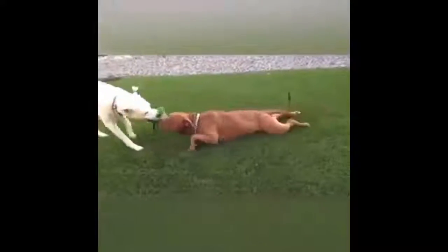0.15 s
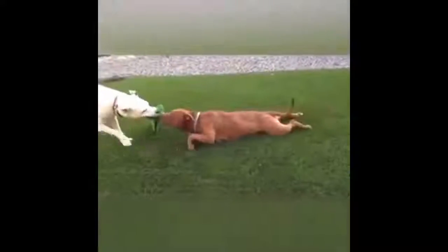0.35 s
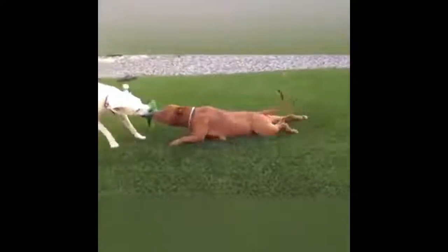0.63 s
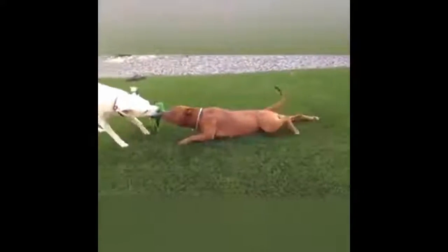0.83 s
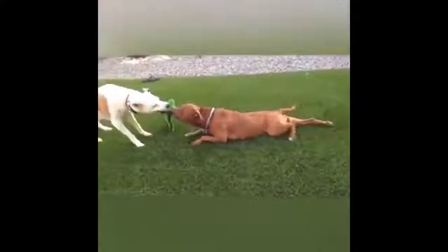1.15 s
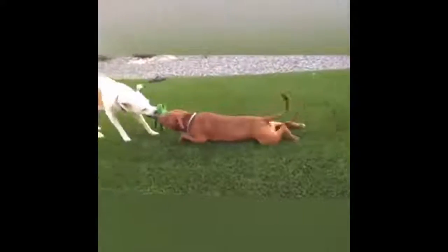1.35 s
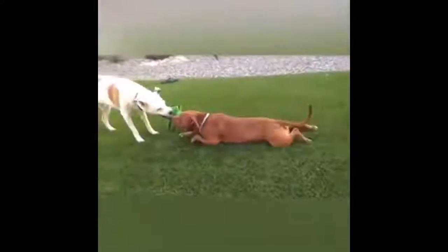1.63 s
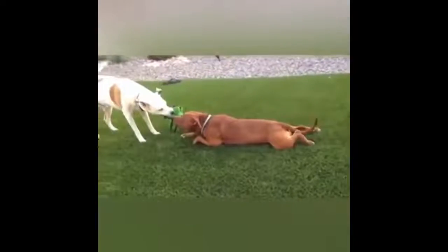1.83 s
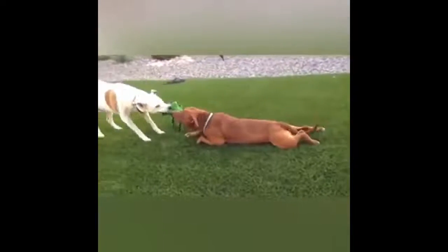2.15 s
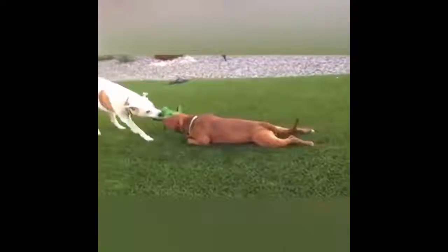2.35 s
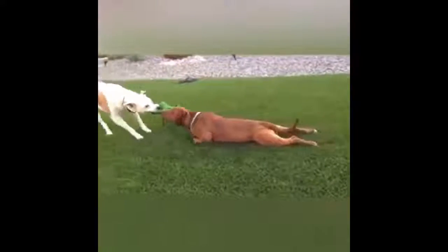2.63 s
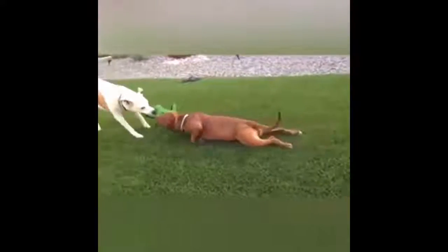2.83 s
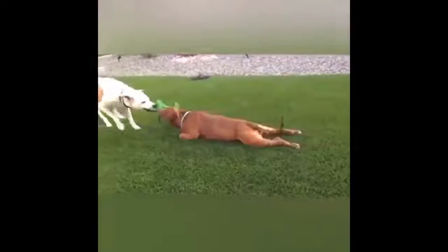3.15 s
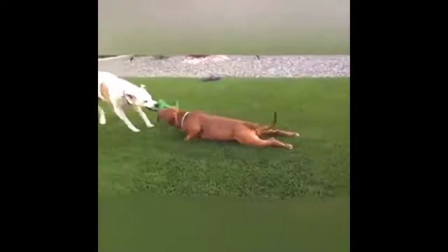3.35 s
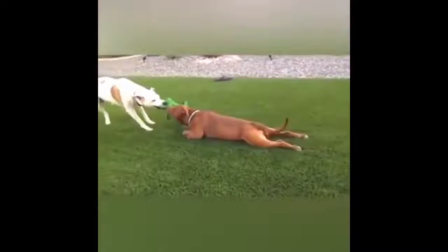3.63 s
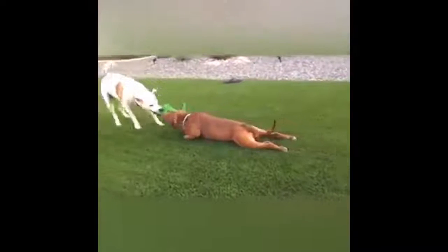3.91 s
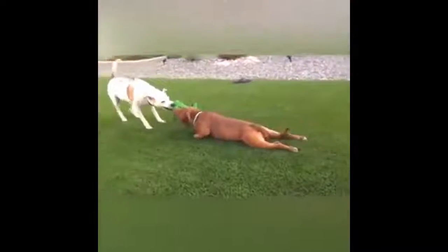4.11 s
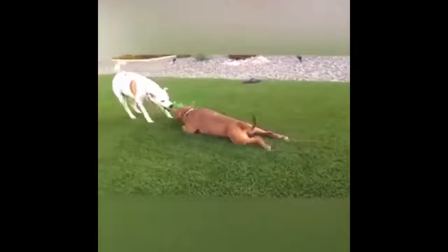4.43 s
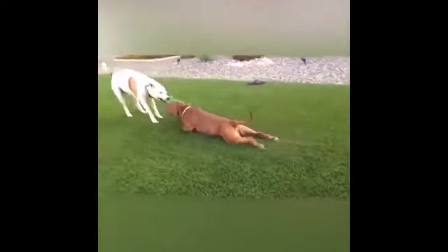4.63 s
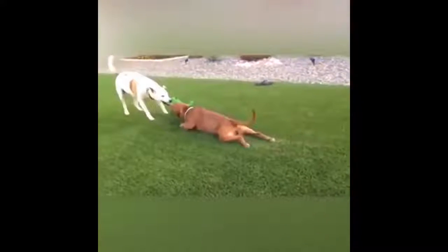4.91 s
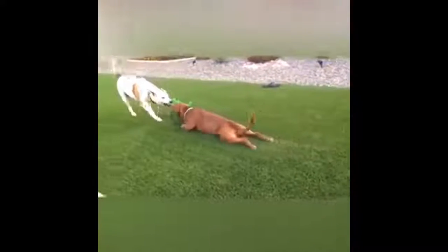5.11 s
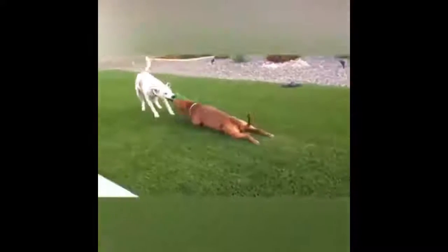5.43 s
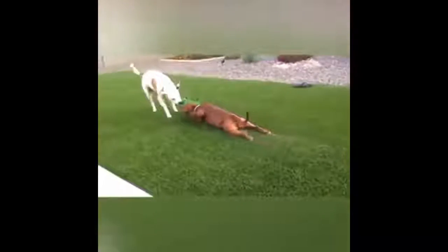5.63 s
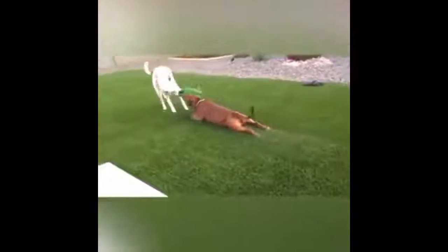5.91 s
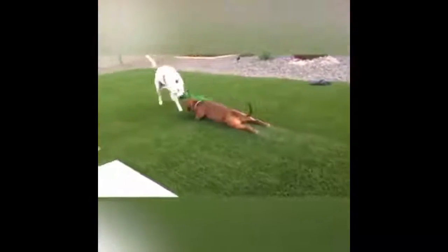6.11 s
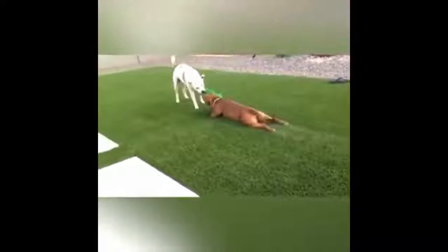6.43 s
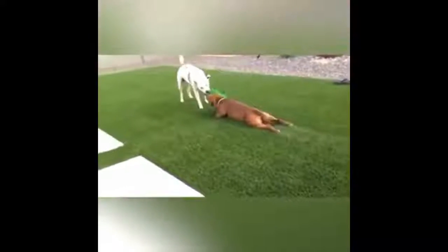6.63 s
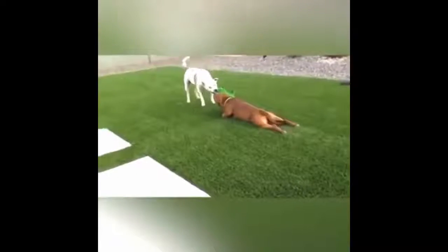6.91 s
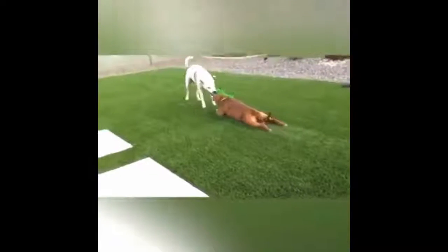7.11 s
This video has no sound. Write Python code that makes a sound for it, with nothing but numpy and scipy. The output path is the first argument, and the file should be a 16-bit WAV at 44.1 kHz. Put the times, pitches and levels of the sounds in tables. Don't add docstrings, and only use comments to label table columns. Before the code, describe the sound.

Low playful dog growls stumble at first, then come steadily, mixed with hoarse breath, gulps, dull paw bumps and small wet mouth noises. After a tiny dropout they continue in quick uneven bursts, rising briefly in pitch past the middle, then flutter and tire, ending on a weak growl. A distant dove coos softly behind. Open yard, soft traffic-like hum, slight dull reflection, plain mono microphone with muted treble.

```python
import sys
import numpy as np
from scipy import signal
from scipy.fft import rfft, irfft, next_fast_len
from scipy.io import wavfile
from scipy.ndimage import uniform_filter1d, map_coordinates

SR = 44100
rng = np.random.default_rng(int(sys.argv[2]) if len(sys.argv) > 2 else 0)


def output_pcm(signal):
    pcm = np.clip(np.atleast_2d(signal).T, -1, 1) * 32767
    wavfile.write(sys.argv[1], SR, np.round(pcm).astype(np.int16))


def attenuation_scalar(level_db):
    decades = np.asarray(level_db, float) / 20
    return 10 ** decades


N = 320166

# start_s, hold_s, opening_db, sag_over_hold_db, top_pitch_hz
STEADY_GROWLS = [
    (0.19, 0.044, -26, 0.5, 239.6),
    (0.659, 0.095, -28, 0, 214.5),
    (.95, 0.25, -28, 7, 204.3),
    (1.393, 0.059, -25.5, 3, 221.8),
    (2.12, 0.26, -27.5, 8.5, 201.6),
    (2.84, 0.033, -27, 4, 199),
    (4.64, 0.12, -29.5, 0, 250),
    (4.775, .06, -27.5, 7, 239.8),
    (7.106, 0.043, -38, -4, 205),
]
# start_s, hold_s, opening_db, sag_over_hold_db, top_pitch_hz
HOARSE_GROWLS = [(.39, 0.1445, -29, 6, 180.2), (1.625, .25, -29.5, 11.5, 165),
                 (2.681, 0.065, -30.5, 5.5, 173.2), (3.03, 0.11, -29.5, 2, 189.2),
                 (3.28, .16, -29, 7.5, 187.4), (3.624, 0.077, -29.5, 5, 172.2),
                 (3.737, 0.0694, -25, 18.5, 200), (4.146, 0.1958, -32, 3, 200),
                 (5.052, 0.22, -30.5, 5, 222), (5.872, 0.15, -33, -3, 228), (6.035, .08, -29, 8, 205),
                 (5.461, 0.1141, -38.5, 3, 188.4), (4.417, 0.046, -33.5, 9.5, 188.7),
                 (6.273, 0.1, -42, -0.5, 156), (6.91, 0.0785, -41.5, -4, 185)]
# start_s, hold_s, opening_db, sag_over_hold_db, top_pitch_hz
GRUNTS = [(0.044, 0.041, -36.5, -6, 165), (0.141, 0.0055, -28, 3, 157.3), (0.85, 0.049, -52, -16, 151.5),
          (1.339, 0.039, -34.5, 3, 146.7), (2.038, 0.068, -40, 2.5, 163), (2.543, 0.011, -28.5, 1, 185.7),
          (3.877, .015, -45.5, 1, 148.6), (3.916, .028, -29, 2.5, 167.7), (3.994, 0.048, -44, 8.5, 143.2),
          (4.075, 0.016, -38, 0, 166.4), (5.694, 0.013, -35, 0, 171.7), (6.569, 0.035, -45.5, -3.5, 145.5)]
# time_s, length_s, depth_db
CHOKES = [(.715, .006, 10), (1.085, .006, 5), (2.2, .008, 7), (4.69, .005, 7), (4.725, .005, 7),
          (4.776, .006, 9), (4.826, .006, 9), (5.082, .005, 7), (5.14, .008, 11), (5.172, .01, 11),
          (5.205, .008, 9), (5.235, .006, 7), (5.928, .005, 8), (5.972, .006, 8), (6.003, .006, 9),
          (6.04, .008, 10), (6.075, .005, 6), (1.67, .006, 9), (1.705, .005, 7), (3.075, .006, 6),
          (2.73, .008, 7)]
# time_s, depth_db
FLUTTER = [(0, 2), (1, 1), (2.4, 1.5), (3.7, 2.5), (4.3, 3.5), (4.75, 1), (5.1, 1.5), (6.1, 1.5), (6.25, 4),
           (7.26, 4)]
# peak_s, length_s, rasp_db, hiss_db
PUFFS = [(.005, 0.05, -42, -44), (0.086, 0.12, -43, -53), (0.223, 0.041, -29.5, -40),
         (0.56, 0.19, -49.5, -55.5), (0.75, 0.14, -39.5, -48), (0.848, 0.2, -43, -55),
         (1.08, 0.3, -38.5, -49.5), (1.224, .08, -40, -48.5), (0.997, 0.1, -39, -54),
         (1.439, 0.093, -36.5, -44.5), (1.797, 0.29, -45.5, -60), (1.896, 0.095, -42.5, -56),
         (2.297, 0.24, -42.5, -53.5), (0.276, 0.16, -46, -52.5), (1.507, 0.11, -44, -48.5),
         (3.362, 0.057, -44, -52), (6.113, 0.061, -48, -48), (3.673, 0.049, -51, -52),
         (4.671, 0.05, -44, -48), (3.819, 0.05, -46, -42.5), (4.841, .09, -42.5, -45.5),
         (5.686, 0.11, -53, -51.5), (2.577, 0.086, -59, -50), (2.763, 0.31, -49.5, -52.5),
         (3.103, 0.11, -44, -47.5), (3.412, 0.25, -41.5, -45), (3.76, 0.25, -40, -49.5),
         (4.004, 0.15, -46, -53.5), (4.238, 0.22, -37, -50.5), (4.774, 0.22, -36, -42),
         (5.184, 0.19, -41.5, -46), (5.263, 0.05, -36.5, -45), (5.558, 0.27, -46, -55.5),
         (5.805, 0.16, -52, -65), (5.994, 0.2, -35, -47), (5.939, .08, -40, -46.5), (6.056, 0.15, -43, -44),
         (6.347, 0.61, -51.5, -59), (6.665, 0.023, -62, -73), (6.984, 0.017, -33, -73.5),
         (7.199, 0.053, -50, -66.5)]
# centre_hz, width_hz, level_db
THROAT = [(119, 252, -3.5), (200, 193.6, 1), (294.3, 53.7, -2.5), (520, 29, -31)]
# centre_hz, width_hz, level_db
JAWS = [(380.4, 236, 3), (681, 367, 3.5), (915, 235, 4)]
# centre_hz, width_hz, level_db
MOUTH = [(467, 290, 2.5), (1200, 310, 3), (1600, 412, 3), (1997, 370, 3.5), (2606, 850, -4)]
# centre_hz, width_hz, level_db
TEETH = [(3400, 350, 9), (3970, 760, 10), (4570, 370, 8), (6360, 3840, -0.5)]
# time_s, peak_db, cavity_hz
SMACKS = [(0.16, -36, 740), (0.22, -26, 1254), (0.56, -25, 1420), (1.336, -25.5, 990), (.462, -33.5, 1100),
          (0.72, -30, 1300), (0.86, -32.5, 1100), (1.4085, -31.5, 1030), (1.843, -34, 1150),
          (2.293, -25.5, 1640), (3.716, -30, 1180), (5, -38, 710), (5.918, -30.5, 2500), (5.49, -36, 1600),
          (6.951, -39.5, 1300), (1.912, -22, 1400), (1.91, -26.5, 2000), (2.0285, -32.5, 1200),
          (2.209, -29.5, 1150), (1.965, -36.5, 1200), (1.6, -38, 3800), (1.8, -33, 1970),
          (3.1, -28.5, 1600), (5.8, -37.5, 1700), (4.8, -36.5, 1600), (2.234, -25, 1150),
          (2.579, -32.5, 1740), (2.761, -22.5, 1190), (2.756, -23.5, 1730), (.693, -26.5, 1800),
          (5.66, -35, 880), (6.186, -33.5, 950), (3.153, -27, 1640), (3.348, -29.5, 1570),
          (3.465, -23, 1670), (3.653, -38, 1265), (3.7854, -27, 1770), (4.19, -28.5, 2000),
          (4.243, -26.5, 1073), (4.733, -31, 1950), (5.975, -27.5, 885), (6.006, -27.5, 1300),
          (3.098, -32, 1500), (3.521, -32, 1550), (5.4, -37.5, 1760), (6.302, -32, 1650), (6.326, -34, 950),
          (6.49, -36, 1700), (2.335, -31, 2000), (2.04, -34, 1150), (6.319, -30, 2050),
          (6.442, -31.5, 1550), (6.798, -23.5, 1630), (6.811, -33, 1600), (5.255, -28.5, 620),
          (4.815, -30, 600), (3.812, -31.5, 1950), (3.835, -33.5, 1150), (3.878, -36, 1700),
          (5.985, -28, 1850), (6.058, -30, 1600), (6.652, -35, 1950), (.765, -31.5, 1250)]
# time_s, peak_db, cavity_hz
SQUELCHES = [(0.488, -31.5, 1620), (0.521, -28.5, 1590), (0.697, -22.5, 1050), (0.735, -23, 1266),
             (1.7433, -28.5, 1930), (3.7399, -26.5, 1960), (5.279, -27, 1935), (5.584, -25.5, 1870),
             (6.2165, -36.5, 1980), (6.631, -30, 1740), (6.974, -24, 2120), (7.133, -36, 1900),
             (4.345, -32.5, 1600), (2.403, -31, 2160), (6.955, -33, 1110), (5.77, -36, 1810),
             (7.012, -24, 1810)]
# time_s, peak_db, cavity_hz
TICKS = [
    (1.068, -30.5, 5960),
    (1.4, -31.5, 1200),
    (1.681, -29, 1940),
    (2.438, -34, 3487),
    (2.495, -24.5, 3350),
    (2.838, -20.5, 3330),
    (3.2174, -26.5, 2080),
    (3.991, -32.5, 1900),
    (4.704, -25, 1870),
    (5.014, -38.5, 1550),
]
# time_s, peak_db, centre_hz
CRACKS = [(.53, -28.5, 2970), (0.805, -23.5, 3510), (2.495, -28, 4500), (2.826, -37.5, 3480),
          (2.91, -31.5, 2572), (3.41, -35.5, 3920), (3.969, -32, 3910), (3.989, -28.5, 2190),
          (5.012, -32.5, 2180), (3.646, -34, 2500), (6.215, -35.5, 3010), (4.519, -34.5, 5800),
          (4.574, -34, 1670), (4.876, -31, 5250), (5.813, -35, 2850), (6.39, -42.5, 3500)]
# time_s, peak_db, centre_hz
SNAPS = [(0.154, -30.5, 700), (1.398, -31, 900), (2.098, -31, 600), (3.645, -30, 1300), (3.742, -27, 1050),
         (3.990, -26, 1200), (4.877, -33, 3500), (5.009, -29, 950), (3.42, -32, 1200), (5.281, -31.5, 3300),
         (5.814, -36, 1800), (6.011, -25, 1700), (6.217, -34, 1600), (6.39, -33, 1200), (.893, -33, 900),
         (.957, -33, 1500), (6.631, -35.5, 3500), (6.983, -25, 1000), (7.135, -33.5, 2210),
         (4.097, -35, 1500)]
# time_s, peak_db, pitch_hz
GULPS = [(0.074, -21.5, 110), (0.29, -39, 110), (0.888, -27, 125), (1.301, -29.5, 148), (1.537, -31, 152),
         (0.44, -20, 101.3), (.915, -30, 125), (1.72, -26, 90), (2.559, -28, 206), (3.134, -32, 113),
         (3.311, -22.5, 120), (3.654, -22.5, 113), (4.25, -24.5, 105), (4.312, -25.5, 106),
         (4.643, -25.5, 105), (4.651, -31, 100), (2.42, -38, 78), (1.841, -24.5, 80.5), (2.02, -26.5, 127),
         (1.8, -28, 120), (2.1, -25, 147), (5.089, -25.5, 153), (6.5, -33.5, 135), (2.939, -44, 57),
         (6.299, -27.5, 148), (6.324, -26.5, 115), (6.387, -27, 130), (5.8, -33.5, 170), (6.756, -34, 150),
         (4.626, -25.5, 140), (1.633, -26.5, 150), (5.5, -29.5, 150), (3.626, -28.5, 130),
         (3.749, -23.5, 160), (6.592, -31, 110), (6.947, -30, 120), (3.882, -35, 130), (4.16, -26, 150),
         (.952, -28, 150), (5.69, -32, 80)]
# time_s, peak_db, length_s
BUMPS = [
    (0.153, -30.5, 0.02),
    (0.891, -29, 0.01),
    (0.914, -31, 0.015),
    (2.098, -31.5, 0.011),
    (4.091, -32, 0.018),
    (5.014, -30, 0.0087),
    (5.815, -29.5, 0.02),
    (6.183, -41, 0.028),
    (6.381, -42, 0.015),
    (6.977, -38.5, 0.018),
]
# time_s, pitch_hz, level_db
DOVE = [
    [(2.47, 520, -62), (2.51, 605, -52), (2.57, 672, -59), (2.66, 615, -54), (2.77, 597, -58)],
    [(2.97, 500.4, -76), (3.02, 516, -54), (3.2, 526, -64.5)],
    [(3.7, 515, -68), (3.78, 520, -47), (3.85, 518, -55.5)],
    [(4.37, 515, -50.5), (4.4, 508, -48), (4.435, 513, -55), (4.46, 501, -47.5), (4.54, 505, -54),
     (4.59, 493, -55)],
]
# frequency_hz, level_db_per_hz
HUM_COLOUR = [(15, -42.5), (25, -19), (65, 3), (180, -2), (286, -9.5), (365, -16.5), (513, -19),
              (1040, -20), (1960, -26), (2330, -22), (3520, -22), (8460, -30), (11000, -31.5),
              (18600, -120)]
# time_s, level_db
HUM_LEVEL = [(0, -45), (.6, -47), (1.3, -45), (2, -47.5), (2.5, -47), (2.95, -45), (3.25, -47.5),
             (3.6, -46.5), (3.9, -47), (4.45, -46.5), (4.95, -48.5), (5.4, -47), (5.75, -47), (6.2, -47),
             (6.7, -49.5), (7.26, -47.5)]

SLACK_ROUGHNESS = 0.9
CATCH_LAG_S = 0.004946


def unit(x):
    return x / np.sqrt(np.mean(x ** 2) + 1e-20)


def curves(rows):
    time_s, *columns = np.transpose(rows)
    return [np.interp(np.arange(N) / SR, time_s, column) for column in columns]


def control_times():
    return np.arange(0, N / SR + 0.002, 0.001)


def wobble(rate):
    points = rng.standard_normal(int(N * rate / SR) + 4)
    return map_coordinates(points, [np.arange(N) * rate / SR])


def filtered(x, response):
    m = next_fast_len(N + SR // 2)
    return irfft(rfft(x, m) * response(np.fft.rfftfreq(m, 1 / SR)), m)[..., :N]


def resonances(modes):
    def response(f):
        total = 0
        for k, (centre, width, db) in enumerate(modes):
            ring = 1j * f * width / (centre * centre - f * f + 1j * f * width)
            total = total + (-1) ** k * attenuation_scalar(db) * ring
        return total
    return response


def evened(x, span):
    return x / np.sqrt(np.abs(uniform_filter1d(x ** 2, int(span * SR))) + 1e-12)


def patchy(depth_db, hz_bins, frames, size):
    z = signal.stft(rng.standard_normal(N + size), nperseg=size)[2]
    field = uniform_filter1d(rng.standard_normal(z.shape), hz_bins, 0)
    field = uniform_filter1d(field, frames, 1)
    return signal.istft(z * attenuation_scalar(depth_db * unit(field)), nperseg=size)[1][:N]


def growl():
    voice_db, pitch_hz, rough = folds()
    rasp_db, hiss_db = breath()
    flutter_hz = 31 + 3 * wobble(8)
    flap_db = curves(FLUTTER)[0] * np.sin(2 * np.pi * np.cumsum(flutter_hz) / SR) + chokes()
    voice_db = voice_db + flap_db
    rasp_db = rasp_db + 0.8 * flap_db
    hiss_db = hiss_db + 0.4 * flap_db

    cycles = np.cumsum(pitch_hz * np.exp(0.33 * rough * wobble(110))) / SR
    growls = STEADY_GROWLS + HOARSE_GROWLS + GRUNTS
    starts = np.sort([round((g[0] + CATCH_LAG_S) * SR) for g in growls])
    call = np.clip(np.searchsorted(starts - 300, np.arange(N)) - 1, 0, None)
    cycles = cycles - cycles[starts][call] + 0.1
    beat = np.floor(cycles).astype(int)

    luck = np.tanh(0.7 * rng.standard_normal((60, 200)))[call, beat]
    luck[beat <= 0] = 0.6
    size = attenuation_scalar(rough * (9 * luck - 5 * (beat % 2)) + 2.5 * luck)
    closing = np.cos(2 * np.pi * (cycles - 0.5)) - 1

    slap = size * np.exp(3 * closing)
    voice = evened(filtered(slap, lambda f: resonances(THROAT)(f) * f / (f - 70j)), span=0.04)
    jaw_ring = evened(filtered(size * np.exp(14 * closing), lambda f: resonances(JAWS)(f) ** 2), span=0.38)
    buzz = evened(filtered(size * np.exp(90 * closing), lambda f: resonances(MOUTH[1:])(f) ** 2), span=0.1)
    voiced = np.clip((voice_db + 52) / 14, 0, 1)

    gate = 1.4 + unit(slap) * np.clip((voice_db + 55) / 15, 0, 1)
    lip_air = gate * patchy(3.6, 3, 5, size=256)
    teeth_air = (gate + 1) * patchy(3.8, 3, 5, size=256)

    def cheek(f):
        return 1 - 0.45 * resonances([(2850, 120, 0)])(f)

    rasp = evened(filtered(lip_air, lambda f: resonances(MOUTH)(f) ** 2 * cheek(f)), span=0.081)
    hiss = evened(filtered(teeth_air, lambda f: resonances(TEETH)(f) ** 2 * cheek(f)), span=0.77)
    tone = attenuation_scalar(voice_db) * voice + attenuation_scalar(0.64 * rasp_db + 0.56 * voice_db) * jaw_ring
    air = attenuation_scalar(rasp_db - 4.0) * (rasp - attenuation_scalar(-9) * voiced * buzz) + attenuation_scalar(hiss_db - 4.5) * hiss
    return air - tone


def folds():
    catch_db_per_s, release_db_per_s = 2500, 395
    bloom_db, bloom_s = 6, 0.0073
    slack_hz, rise_s, fall_s, sag_hz_per_db = 165, 0.09, 0.055, 3.5
    opening_rough, settle_s = 0.3, 0.03
    t = control_times()
    groups = [(STEADY_GROWLS, 0.25), (HOARSE_GROWLS, 0.55), (GRUNTS, SLACK_ROUGHNESS)]
    rows = [(*g, roughness) for table, roughness in groups for g in table]
    start, hold, open_db, sag_db, top_hz, settled = np.transpose(rows)[..., None]
    since = t - start - CATCH_LAG_S
    sag = sag_db * np.clip(since / hold, 0, 1)

    level = open_db - sag
    level = level + catch_db_per_s * np.minimum(since, 0)
    level = level - release_db_per_s * np.maximum(since - hold, 0)
    level = level - bloom_db * np.exp(-np.abs(since) / bloom_s)

    climb = since / np.minimum(rise_s, 0.599 * hold)
    arch = np.clip(np.minimum(climb, 1 - (since - hold) / fall_s), 0, 1)
    pitch = np.minimum(slack_hz, top_hz) + arch * np.maximum(top_hz - slack_hz, 0)
    pitch = pitch - sag_hz_per_db * sag

    loosening = np.maximum(np.exp(-(since / settle_s) ** 2), (1 - arch) * (since > hold))
    rough = settled + np.minimum(opening_rough, SLACK_ROUGHNESS - settled) * loosening
    lead = level.argmax(axis=0), np.arange(len(t))
    return curves(np.transpose([t, level[lead], pitch[lead], rough[lead]]))


def breath():
    drop_db, edge = 17.5, 2.5
    t = control_times()
    peak, length, rasp_db, hiss_db = np.transpose(PUFFS)[..., None]

    def puffs(db, pant_db, lag_s):
        away = np.abs((t - peak - lag_s) / (length * 0.5))
        return np.maximum((db - drop_db * away ** edge).max(axis=0), pant_db)

    return curves(np.transpose([t, puffs(rasp_db, -55.5, 0), puffs(hiss_db, -69.5, 0.005)]))


def chokes():
    t = control_times()
    time_s, length, depth_db = np.transpose(CHOKES)[..., None]
    dip_db = -(depth_db * np.exp(-((t - time_s) / length) ** 2)).sum(axis=0)
    return curves(np.transpose([t, dip_db]))[0]


def smacks():
    lead_share, click_top_hz = 0.45, 2000
    # table, length in s, click level in dB
    kinds = [(SMACKS, 0.016, -18.5), (SQUELCHES, 0.038, -16), (TICKS, 0.0085, -14.5),
             (CRACKS, 0.012, -2.5), (SNAPS, 0.005, -6)]
    rows = [(*event, length, click_db) for table, length, click_db in kinds for event in table]
    out, t = np.zeros(N + SR), np.arange(SR // 8) / SR
    since = t - 0.03
    noises = rng.standard_normal((len(rows), 2, len(t)))
    for (time_s, db, hz, length, click_db), (burst, click) in zip(rows, noises):
        pace = length / 3.58 * np.where(since < 0, lead_share, 1)
        shape = np.exp(-np.hypot(since, 0.002) / pace)
        ring = t * np.sin(2 * np.pi * hz * t) * np.exp(-np.pi * 0.35 * hz * t)
        wet = signal.fftconvolve(burst, ring)[:len(t)]
        dull = np.exp(-2 * np.pi * max(click_top_hz, hz) * t[:64])
        click = np.convolve(np.convolve(click, dull), dull)
        click = np.diff(click)[:len(t)]
        puff = shape * (unit(wet) + attenuation_scalar(click_db) * unit(click))
        out[round(time_s * SR):][:len(t)] += attenuation_scalar(db - 4.5) * puff / np.abs(puff).max()
    return out[round(0.029 * SR):][:N]


def gulps():
    out, t = np.zeros(N + SR), np.arange(SR // 20) / SR
    for time_s, db, hz in GULPS:
        shape = np.exp(-0.9 * hz * t) * (1 - np.exp(-t / 0.00028))
        out[round(time_s * SR):][:len(t)] += attenuation_scalar(db + 4.5) * np.sin(2 * np.pi * hz * t) * shape
    return out[:N]


def bumps():
    out, t = np.zeros(N + SR), np.arange(SR // 10) / SR
    for (time_s, db, length), puff in zip(BUMPS, rng.standard_normal((len(BUMPS), len(t)))):
        out[round(time_s * SR):][:len(t)] += attenuation_scalar(db + 12.5) * puff * np.exp(-2.5 * t / length)
    return filtered(out[:N], resonances([(410, 170, -1.0), (1520, 1720, -14.0)]))


def yard(x):
    t = np.arange(SR // 5) / SR
    tail = rng.standard_normal(len(t)) * attenuation_scalar(-60 * t / 0.13) * (t > 0.004)
    return x + attenuation_scalar(-17) * signal.fftconvolve(x, tail / np.linalg.norm(tail))[:N]


def sounding(calls, rise, fall):
    t = np.arange(N) / SR
    fades = []
    for call in calls:
        first, last = call[0][0], call[-1][0]
        fades.append(np.interp(t, [first - rise, first, last, last + fall], [0, 1, 1, 0]))
    return np.max(fades, axis=0)


def dove():
    pitch_hz, level_db = curves(sum(DOVE, []))
    tone = np.sin(2 * np.pi * np.cumsum(pitch_hz + 6 * wobble(30)) / SR)
    level = np.sqrt(2) * attenuation_scalar(level_db + 1.2 * wobble(12) - 1)
    return level * sounding(DOVE, rise=0.023, fall=0.03) * tone


def hum():
    hz, db = np.transpose(HUM_COLOUR)
    noise = patchy(2.32, 8, 10, size=512)
    noise = filtered(noise, lambda f: attenuation_scalar(np.interp(np.log(f + 1), np.log(hz + 1), db)))
    return attenuation_scalar(curves(HUM_LEVEL)[0] + 0.6 * wobble(6.6)) * unit(noise)


def scene():
    low_cut_hz = 60
    dogs = growl() + smacks() + bumps() + gulps()
    dogs = filtered(dogs, lambda f: (f / (f - 1j * low_cut_hz)) ** 2)
    return (yard(dogs) + dove() + hum())[None]


def band_limit(x):
    return signal.sosfilt(signal.butter(12, 14000, fs=SR, output="sos"), x)


def record(dry):
    top_hz, lost_from_s, lost_to_s = 8620, 1.1713, 1.1945
    t = np.arange(N) / SR
    kept = filtered(dry, lambda hz: hz < top_hz) * ((t < lost_from_s) | (t > lost_to_s))
    kept = kept + attenuation_scalar(-67.5) * filtered(rng.standard_normal(kept.shape), lambda hz: hz < top_hz)
    stray = filtered(rng.standard_normal(N), lambda hz: (hz > 10000) & (hz < 12700))
    kept = kept + attenuation_scalar(-98 + 6 * wobble(22)) * stray
    return band_limit(kept)


dry = scene()
out = record(dry)
output_pcm(out)
```